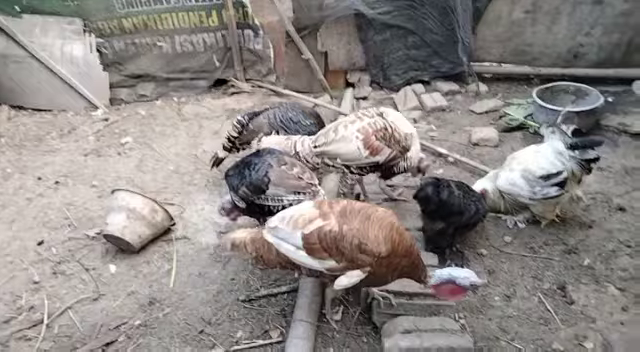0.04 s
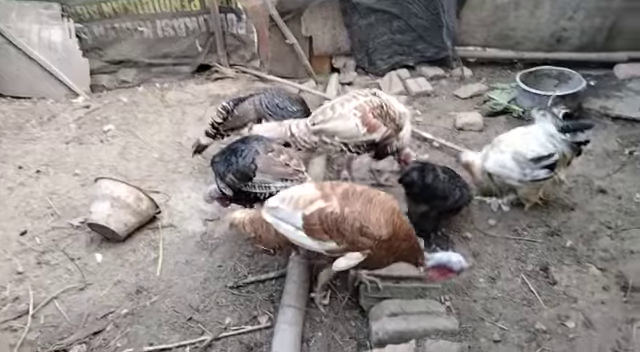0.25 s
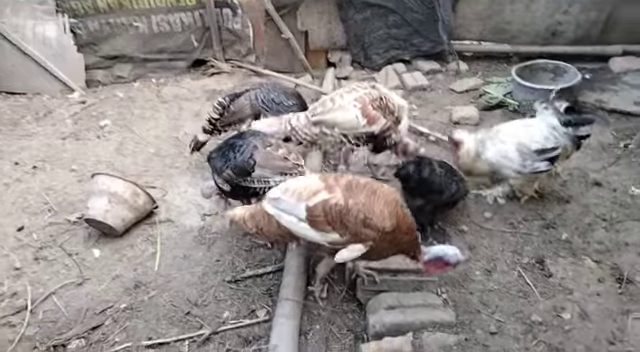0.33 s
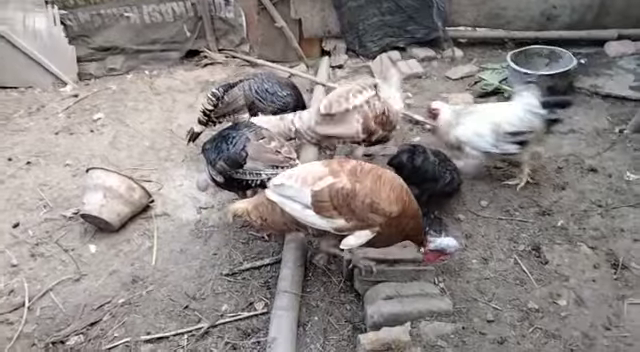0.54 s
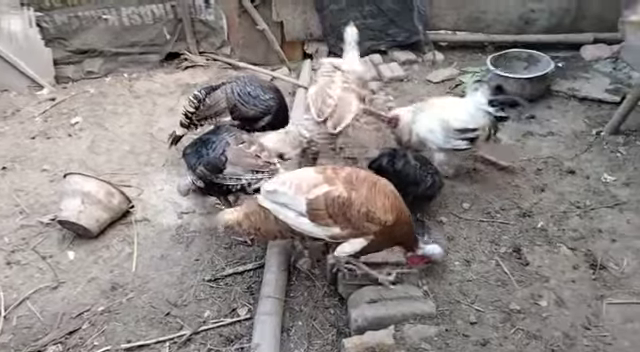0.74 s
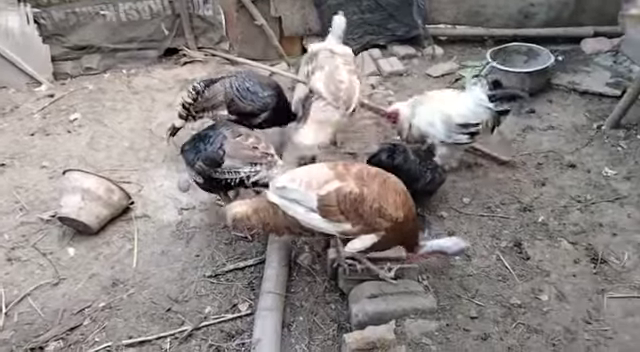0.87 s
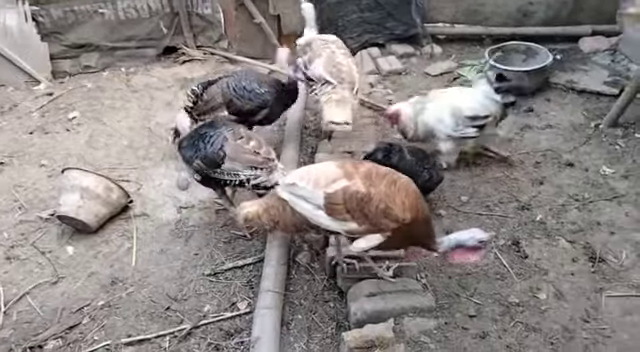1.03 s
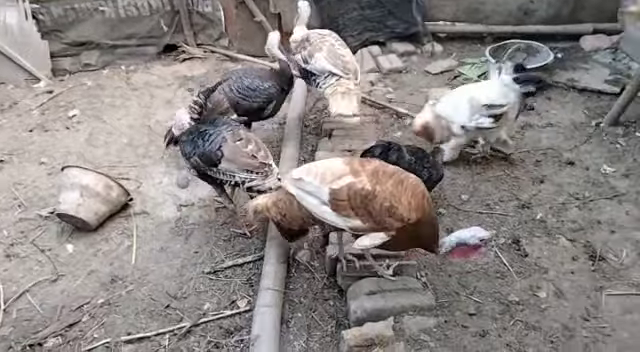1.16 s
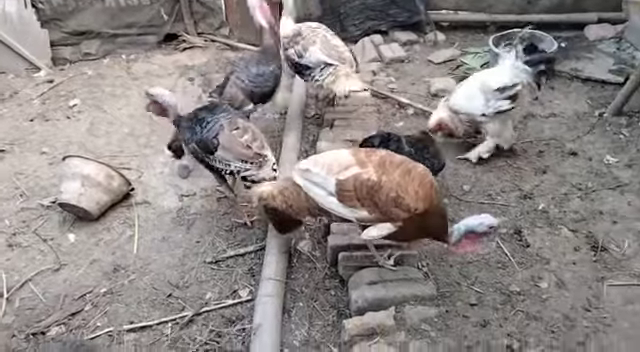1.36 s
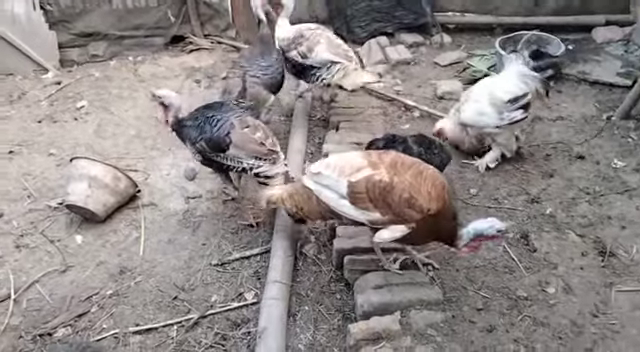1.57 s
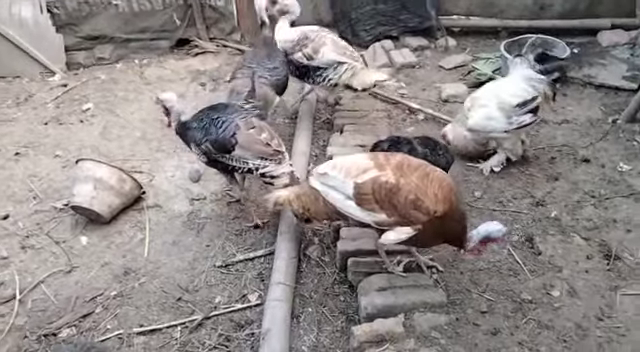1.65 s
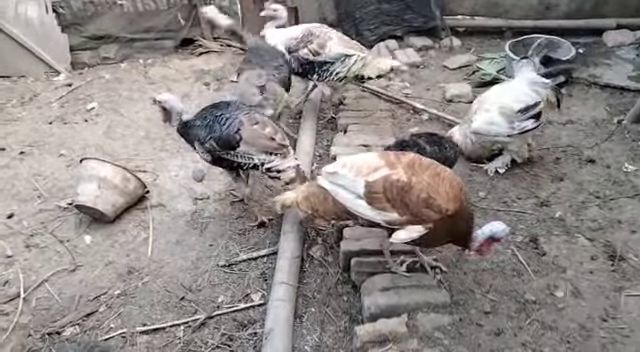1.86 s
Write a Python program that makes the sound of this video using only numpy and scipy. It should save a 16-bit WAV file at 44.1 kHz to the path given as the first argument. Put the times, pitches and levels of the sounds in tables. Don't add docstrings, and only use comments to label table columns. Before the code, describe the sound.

Turkey calls in a fenced dirt yard: after a faint fade-in, a clear whistle breaks into a hoarse squawk, then separate quick yelps follow, with light beak and foot knocks, over faint low rumble; handheld microphone fairly near.

```python
import sys
import numpy as np
from scipy import signal
from scipy.fft import rfft, irfft
from scipy.io import wavfile
from scipy.ndimage import map_coordinates

SR = 44100
rng = np.random.default_rng(int(sys.argv[2]) if len(sys.argv) > 2 else 0)


def transcribe(u):
    v = np.clip(np.atleast_2d(u).T, -1, 1)
    q = np.round(v * 32767).astype(np.int16)
    wavfile.write(sys.argv[1], SR, q)


def convert_level_to_amplitude(level_db):
    exponent = np.asarray(level_db, float) / 20
    return 10 ** exponent


N = 83790


def unit(x):
    return x / np.sqrt(np.mean(np.abs(x) ** 2) + 1e-20)


def along(points, hz):
    f, v = np.transpose(points)
    return np.interp(np.log(hz + 1), np.log(f + 1), v)


def wobble(rate_hz, size):
    points = rng.standard_normal(int(N * 900 / SR) + 9)
    return map_coordinates(points, [np.arange(size) * min(rate_hz, 900) / SR + 2])


def noise(spectrum, size):
    hz = np.fft.rfftfreq(size, 1 / SR)
    inside = (hz > spectrum[0][0]) & (hz < spectrum[-1][0])
    white = rfft(rng.standard_normal(size))
    return unit(irfft(white * convert_level_to_amplitude(along(spectrum, hz)) * inside, size))


def add(track, start_s, sound):
    part = track[round(start_s * SR):][:len(sound)]
    part += sound[:len(part)]


# f/Hz, level/dB per Hz
TRAFFIC_SPECTRUM = [(22, -42), (38, 6), (86, 3), (118, -1.5), (140, -16.5), (180, -36), (310, -120)]


def traffic():
    return convert_level_to_amplitude(-56 + 1.2 * wobble(4.0, N)) * noise(TRAFFIC_SPECTRUM, N)


# f/Hz, level/dB per Hz
AIR_SPECTRUM = [(76, -33), (130, 7.5), (459, 1), (727, -7), (788, -11.5), (1620, -0.5), (2140, -11),
                (8710, -22), (15600, -17)]
GUST_DB = 1.5


def yard_air():
    gust_db = GUST_DB * wobble(4.46, N) + GUST_DB * wobble(40.2, N)
    return convert_level_to_amplitude(-62 + gust_db) * noise(AIR_SPECTRUM, N)


# t/s, level/dB
RUSTLE_LEVEL = [(.27, -77), (0.328, -53.5), (.62, -61), (.68, -72.5), (.85, -69.5), (1.05, -61),
                (1.24, -61.5), (1.46, -69.5), (1.49, -74.5), (1.7, -66), (1.82, -74.5)]
# f/Hz, level/dB per Hz
RUSTLE_SPECTRUM = [(2000, -2.5), (5000, -14.5), (8800, 1.5), (11000, -7), (15500, -11)]
GRAIN_DB = 2.5


def rustle():
    s, db = np.transpose(RUSTLE_LEVEL)
    level_db = np.interp(np.arange(N) / SR, s, db)
    grain_db = GUST_DB * wobble(30.9, N) + GRAIN_DB * wobble(250, N)
    return convert_level_to_amplitude(level_db + grain_db) * noise(RUSTLE_SPECTRUM, N)


# t/s, length/s, f/Hz, level/dB, step per overtone/dB
SOFT_NOTES = [
    (.135, 0.028, 1513, -74.5, -15),
    (.18, 0.041, 1520, -71.5, -13),
    (.238, 0.048, 3360, -79.5, -34),
    (.845, 0.038, 215, -64, -2.5),
    (.93, 0.072, 226.6, -65.5, -2),
    (1.08, 0.054, 498.5, -73, -5.5),
    (1.364, 0.032, 755, -76, -24),
    (1.66, 0.025, 1106, -51.5, -37),
]


def soft_notes():
    out = np.zeros(N)
    for s, length_s, hz, db, step_db in SOFT_NOTES:
        t = np.arange(round(length_s * SR)) / SR
        phase = 2 * np.pi * hz * (t - 0.031 * t ** 2 / length_s)
        stack = sum(convert_level_to_amplitude(step_db * k) * np.sin((k + 1) * phase + k * k) for k in range(5))
        arch = np.abs(np.sin(np.pi * t / length_s)) ** .5
        add(out, s, convert_level_to_amplitude(db + 7.5) * arch * stack)
    return out


# f/Hz, T60/s
ECHO_T60 = [(400, 0.68), (1600, 0.33), (4000, 0.35), (10000, 0.14)]
ECHO_DELAY_S = .008


def yard_echo(x):
    hz, t, z = signal.stft(rng.standard_normal(SR // 2), SR, nperseg=256)
    decay = convert_level_to_amplitude(-60 * t / along(ECHO_T60, hz)[:, None])
    tail = signal.istft(z * decay, SR, nperseg=256)[1]
    late = np.pad(x, (round(ECHO_DELAY_S * SR), 0))
    return signal.fftconvolve(late, tail / np.linalg.norm(tail))[:N]


# f/Hz, width/Hz, level/dB
WINDPIPE = [(2000, 1100, 3), (3650, 300, 7), (5050, 350, 7), (7000, 500, 5), (9000, 1600, 0)]


def windpipe(f):
    response = 0
    for k, (centre_hz, width_hz, db) in enumerate(WINDPIPE):
        damping = 1j * f * width_hz
        response = response + (-1) ** k * convert_level_to_amplitude(db) * damping / (centre_hz ** 2 - f * f + damping)
    return response


def hiss(size):
    f = np.fft.rfftfreq(size, 1 / SR)
    white = rfft(rng.standard_normal(size))
    return unit(irfft(white * windpipe(f) / (1 + (f / 11000) ** 10), size))


EDGE_S, BRIGHT_FROM_HZ, PIPE_FLOOR = .004, 2300, .2
JITTER_HZ, JITTER_SHARE = 300, .06
FLUTTER_HZ, ROUGH_GROWS = 150, .1
EFFORT_BRIGHTENS = 0.37
OVERTONE_PATCH_DB, PATCH_HZ, RASP_DB = 2.5, 45, -8


def call(rows, throat, odd_lift_db, bright_db, breath_db):
    s, *cols = np.transpose(rows)
    t = np.arange(s[0], s[-1], 1 / SR)
    size = len(t)
    hz, level_db, half_db, rough = [np.interp(t, s, c) for c in cols]
    jitter = JITTER_SHARE * rough ** 2 * wobble(JITTER_HZ, size)
    phase = np.pi * np.cumsum(hz * (1 + jitter)) / SR
    effort_db = bright_db + EFFORT_BRIGHTENS * (level_db - level_db.max())
    tone, power = 0, 0
    for k in range(1, 23):
        partial_hz = k * hz / 2
        odd = k % 2
        upper = partial_hz.mean() > BRIGHT_FROM_HZ
        upper_db = effort_db + odd_lift_db * odd + OVERTONE_PATCH_DB * wobble(PATCH_HZ, size)
        gain = convert_level_to_amplitude(along(throat, partial_hz) + half_db * odd + upper_db * upper)
        gain = gain * (PIPE_FLOOR + np.abs(windpipe(partial_hz))) ** upper
        shake = np.clip(rough * (1 + 2 * ROUGH_GROWS * max(k - 2, 0)), 0, 1)
        flutter_hz = FLUTTER_HZ * (1 + ROUGH_GROWS * k)
        random = (wobble(flutter_hz, size) + 1j * wobble(flutter_hz, size)) / np.sqrt(2)
        flutter = np.sqrt(1 - shake ** 2) + shake * random
        tone = tone + gain * np.imag(flutter * np.exp(1j * k * phase))
        power = power + gain ** 2 / 2
    pulsing = 1 + .5 * np.cos(phase)
    breath = convert_level_to_amplitude(breath_db + 3.2 * wobble(53.0, size)) * (1.45 + rough) * pulsing * hiss(size)
    rasp = convert_level_to_amplitude(RASP_DB) * rough ** 2 * noise(throat, size)
    edge = np.clip(np.minimum(t - s[0], s[-1] + 0.0039 - t) / EDGE_S, 0, 1)
    return convert_level_to_amplitude(level_db) * edge * (tone / np.sqrt(power) + breath + rasp)


# t/s, f/Hz, level/dB
LEAD_IN = [(0.273, 1125, -53.5), (0.29, 1394, -48), (.31, 1401, -39), (0.325, 1492, -36)]
YELP_A = [(.478, 1882, -47), (.495, 1929, -39.5), (0.518, 2011, -39.5), (0.529, 2052, -34.5),
          (0.537, 1831, -39), (0.541, 1547, -35.5), (0.554, 1503, -45.5), (0.575, 1288, -56)]
YELP_B = [(0.693, 1691, -60), (0.707, 2090, -54), (0.719, 1898, -46), (0.745, 1869, -43.5),
          (0.751, 2031, -42.5), (0.762, 1744, -42.5), (0.773, 1737, -43.5), (0.783, 1615, -42.5),
          (0.822, 1505, -54.5)]
YELP_C = [(0.931, 1981, -52), (0.942, 1886, -49), (0.954, 1884, -35.5), (0.958, 1647, -35.5),
          (0.985, 1596, -34), (0.997, 1460, -35.5), (1.013, 1473, -58), (1.036, 1288, -55),
          (1.056, 1035, -59)]
YELP_D = [(1.219, 1968, -64), (1.244, 1898, -43), (1.255, 1700, -45.5), (1.27, 1620, -45.5),
          (1.284, 1780, -46.5), (1.302, 1719, -44.5), (1.329, 1746, -40.5), (1.341, 1519, -44),
          (1.356, 1438, -42.5)]
YELP_E = [(1.53, 1610, -63), (1.543, 1705, -55), (1.556, 1644, -42), (1.577, 1623, -42), (1.589, 1703, -38),
          (1.614, 1671, -34.5), (1.628, 1531, -38.5), (1.641, 1352, -40.5), (1.654, 1230, -46.5)]
YELP_F = [(1.885, 1340, -93), (1.892, 1596, -50), (1.899, 1716, -49)]
YELP_G = [(1.001, 1634, -55.5), (1.029, 1620, -65.5), (1.066, 1615, -62.5), (1.089, 1650, -70)]
BREAK = [(1.346, 1986, -57), (1.358, 1966, -45.5), (1.366, 1692, -50), (1.385, 1481, -58.5),
         (1.41, 1485, -56.5)]
# t/s, whistle f/Hz, level/dB, half-pitch mode/dB, roughness/0-1
SQUAWK = [(.311, 1420, -41, 6, .25), (.33, 1400, -40, -2, .8), (.37, 1390, -41, -1, .75),
          (.405, 1310, -35, -4, .8), (.43, 1420, -38, 0, .95), (.495, 1330, -43, 3, 1)]
# f/Hz, level/dB
YELP_THROAT = [(700, -12), (1300, 9.5), (2100, 2), (2500, -18.5), (3500, -12.5), (5000, -19.5),
               (9000, -15.5), (14000, -41)]
SQUAWK_THROAT = [(600, -14.5), (1400, -6), (2100, 1.5), (2700, -2), (3600, -20.5), (5000, -45),
                 (9000, -17.5), (13000, -45)]
# half-pitch mode low down/dB, same among overtones/dB, brightness/dB
CALL_VOICE = [(-36, -40, 2), (-7.5, 7, -5), (-13, 2, 1), (-18, -25, -7), (-32, -8, -5), (-19, 1, -1.5),
              (-36, -30, -24), (-30, -34, 19), (7.5, -4, 7.5)]
# roughness at start/0-1, at end/0-1, breath/dB
CALL_ROUGHNESS = [(.06, .25, -36), (.3, .95, -17), (.22, .75, -29), (.15, .7, -30), (.22, .55, -33),
                  (.2, .55, -33), (.15, .2, -30), (.3, .45, -22), (.85, .95, -15)]


def turkeys():
    out = np.zeros(N)
    squawk = call(SQUAWK, SQUAWK_THROAT, odd_lift_db=0, bright_db=0, breath_db=-26)
    add(out, SQUAWK[0][0], squawk)
    calls = LEAD_IN, YELP_A, YELP_B, YELP_C, YELP_D, YELP_E, YELP_F, YELP_G, BREAK
    for rows, voice, roughness in zip(calls, CALL_VOICE, CALL_ROUGHNESS):
        half_db, upper_half_db, bright_db = voice
        clear, hoarse, breath_db = roughness
        s = np.array(rows)[:, 0]
        progress = (s - s[0]) / (s[-1] - s[0])
        rough = clear + (hoarse - clear) * progress ** 2
        table = np.column_stack([rows, half_db + 0 * s, rough])
        add(out, s[0], call(table, YELP_THROAT, upper_half_db - half_db, bright_db, breath_db))
    highpass = signal.butter(4, 480, "high", fs=SR, output="sos")
    return signal.sosfilt(highpass, out)


# t/s, level/dB, thud over snap/dB, T60/s
KNOCKS = [(.522, -52, -11, 0.14), (.535, -46, -5, 0.082), (0.659, -60, -18, 0.12),
          (0.723, -37.5, -20, 0.0095), (0.889, -54, 4, 0.027), (0.998, -61, 0, 0.12),
          (1.0619, -46, -21, 0.019), (1.205, -69, 18.5, 0.058), (1.231, -60, 19, 0.017),
          (1.296, -50, -18, 0.045), (1.352, -62, 3, 0.2), (1.436, -52.5, -5.5, 0.11),
          (1.6072, -31.5, -22, 0.017), (1.6113, -35.5, -11, 0.042), (1.6139, -57.5, -17, 0.11),
          (1.538, -49, -14, 0.014), (1.644, -46, 6, 0.03), (1.7605, -47, -5, 0.052)]
# f/Hz, level/dB
SNAP_SPECTRUM = [(500, -120), (1200, -13), (3000, 3), (6000, 2), (9000, 9.5), (11000, 0.5), (15500, -7.5)]
THUD_SPECTRUM = [(100, -8), (240, -0.5), (600, 4.5), (900, 6), (1500, -5), (4000, -35)]


def knocks():
    out = np.zeros(N)
    t = np.arange(SR // 5) / SR
    for s, db, thud_db, t60_s in KNOCKS:
        snap = convert_level_to_amplitude(1.2 * wobble(390, len(t))) * noise(SNAP_SPECTRUM, len(t))
        thud = convert_level_to_amplitude(thud_db) * noise(THUD_SPECTRUM, len(t))
        attack = 1 - np.exp(-t / 0.00079)
        add(out, s, convert_level_to_amplitude(db - 60 * t / t60_s) * attack * (snap + thud))
    return out


# t/s, f/Hz, level/dB
FAR_ENGINE = [(0.799, 80, -86), (0.819, 79.3, -47.5), (.93, 76.8, -55), (1.05, 89.3, -49), (1.075, 93, -69)]


def far_engine():
    t = np.arange(N) / SR
    s, hz, db = np.transpose(FAR_ENGINE)
    phase = 2 * np.pi * np.cumsum(np.interp(t, s, hz)) / SR
    return convert_level_to_amplitude(np.interp(t, s, db) + 2 * wobble(26.0, N)) * np.sin(phase)


# t/s, level/dB
BACKGROUND_DUCK = [(.1, -8), (.26, -5.5), (.3, 4), (0.338, -10.5), (.48, -5), (0.601, -5), (.68, -4)]


def scene():
    birds = soft_notes() + turkeys() + knocks()
    echo = convert_level_to_amplitude(-9) * yard_echo(birds)
    duck = convert_level_to_amplitude(np.interp(np.arange(N) / SR, *np.transpose(BACKGROUND_DUCK)))
    background = traffic() + yard_air() + far_engine()
    return (birds + echo + duck * background + rustle())[None]


def roll_off(x):
    return signal.sosfilt(signal.butter(12, 15710, fs=SR, output="sos"), x)


# t/s, level/dB
GAIN_OPENS = [(0.061, -28), (0.097, -15), (.2, -9), (0.282, -6), (.34, -1)]
# t/s, level/dB
OFFSET_STEPS = [(.1692, -50), (.2292, -50), (.2692, -46)]
OFFSET, OFFSET_START_S, OFFSET_RISE_S, OFFSET_DRAIN_S, STEP_T60_S = -.046, .135, .09, .53, .04


def record(dry):
    t = np.arange(N) / SR
    since = np.clip(t - OFFSET_START_S, 0, None)
    offset = OFFSET * (1 - np.exp(-since / OFFSET_RISE_S)) * np.exp(-since / OFFSET_DRAIN_S)
    for s, db in OFFSET_STEPS:
        offset = offset + (t > s) * convert_level_to_amplitude(db - 60 * np.abs(t - s) / STEP_T60_S)
    s, db = np.transpose(GAIN_OPENS)
    gain = convert_level_to_amplitude(np.interp(t, s, db, right=0)) * (t > s[0])
    return roll_off(dry * gain + offset)


dry = scene()
out = record(dry)
transcribe(out)
```